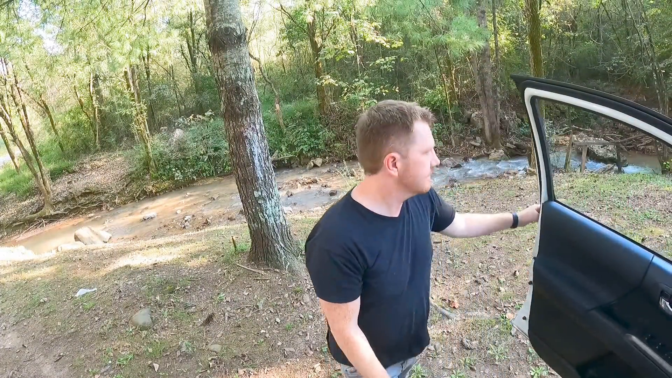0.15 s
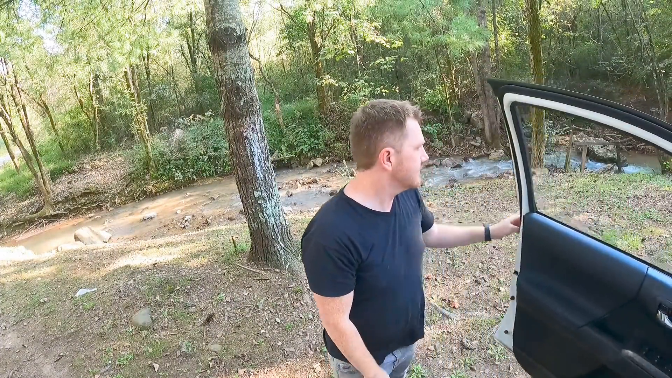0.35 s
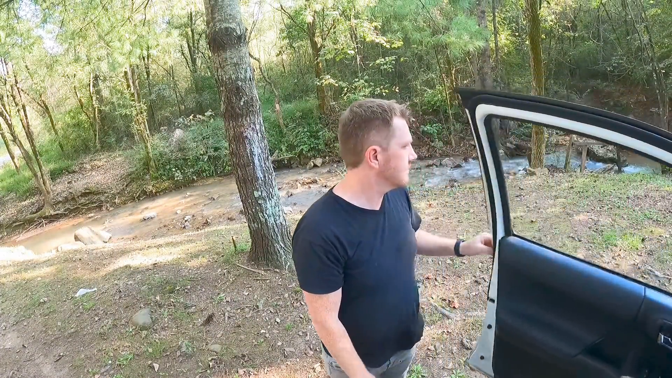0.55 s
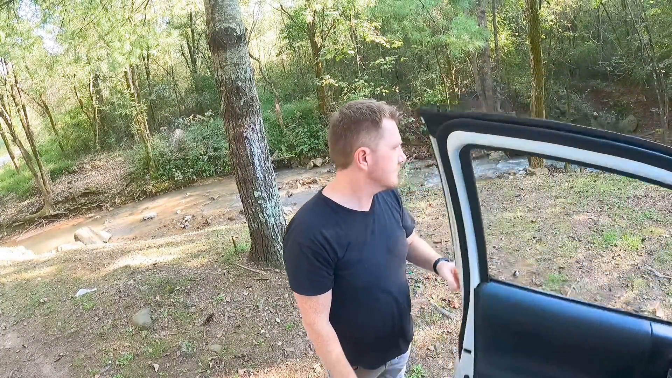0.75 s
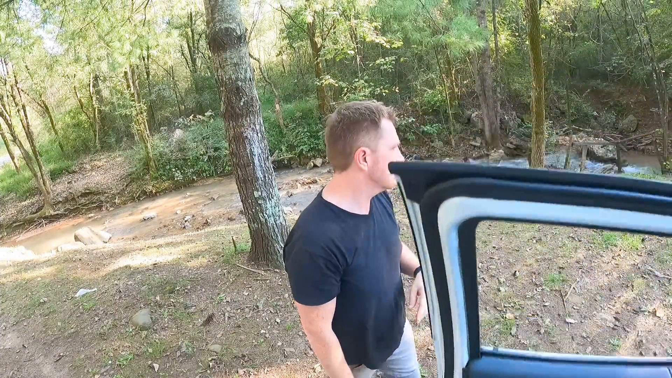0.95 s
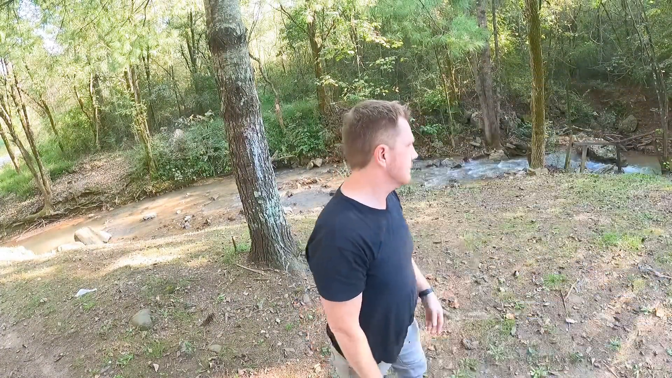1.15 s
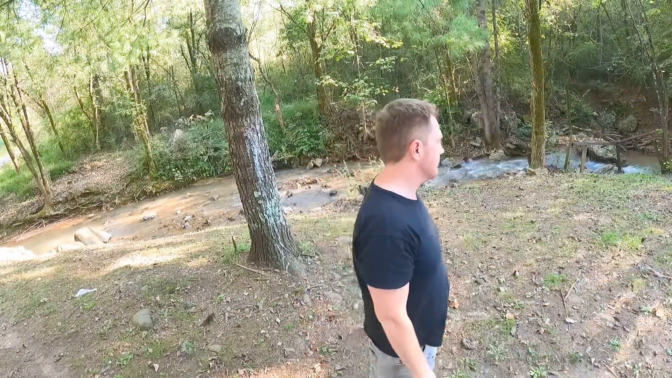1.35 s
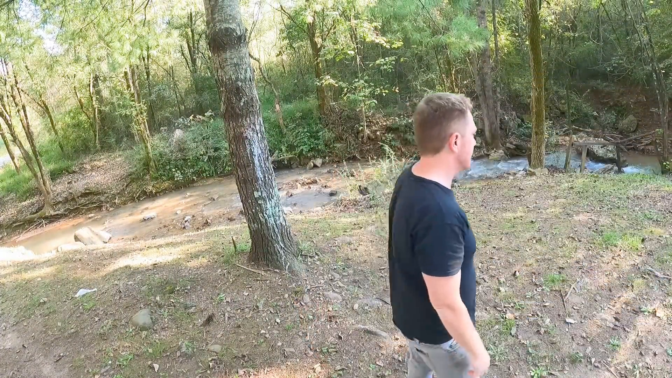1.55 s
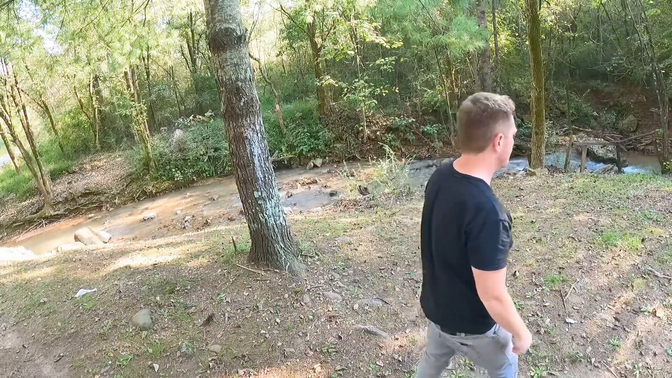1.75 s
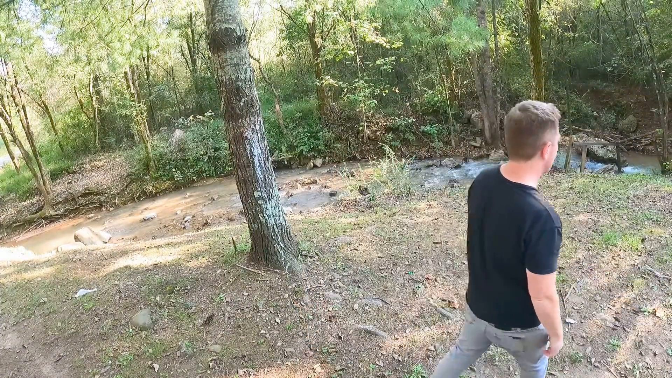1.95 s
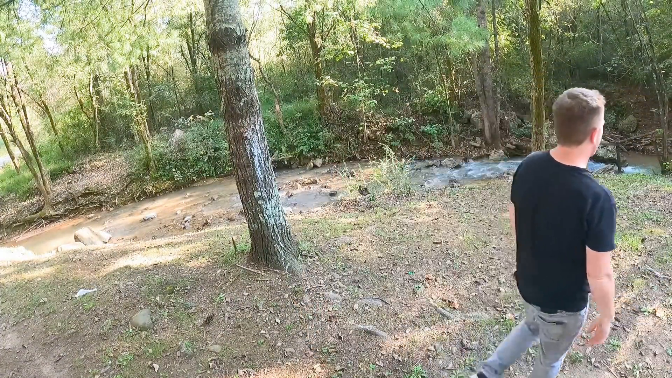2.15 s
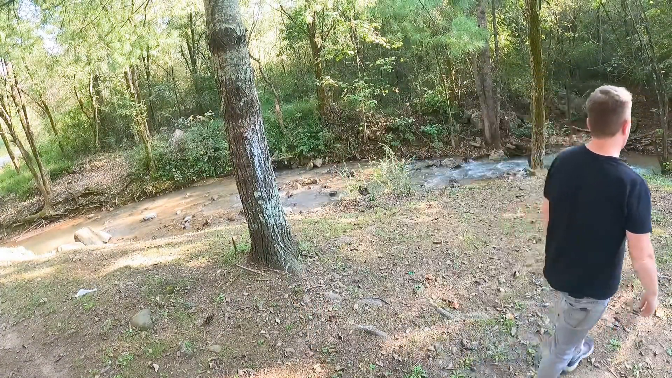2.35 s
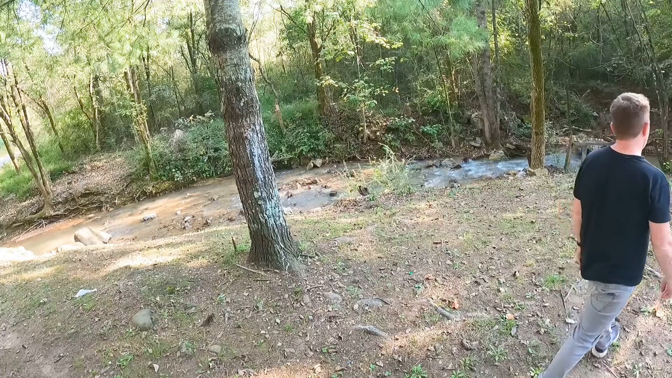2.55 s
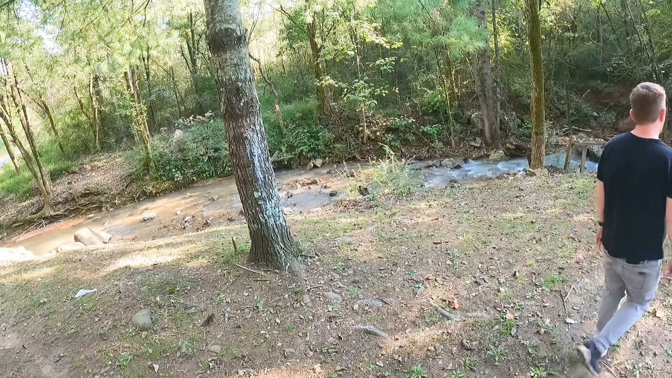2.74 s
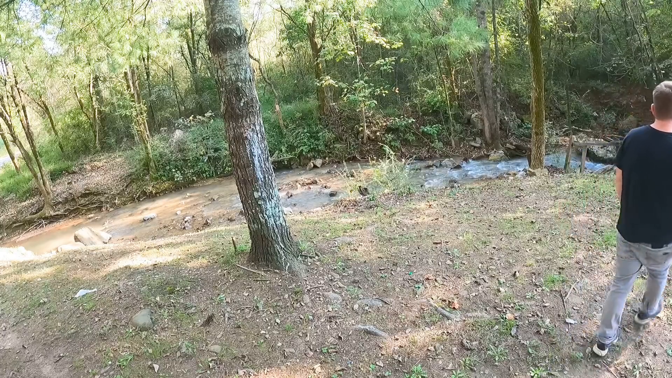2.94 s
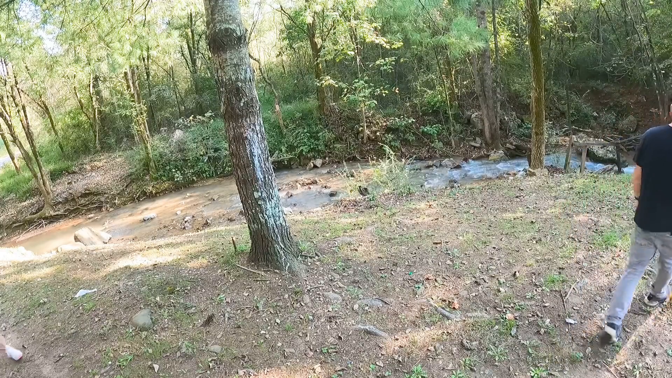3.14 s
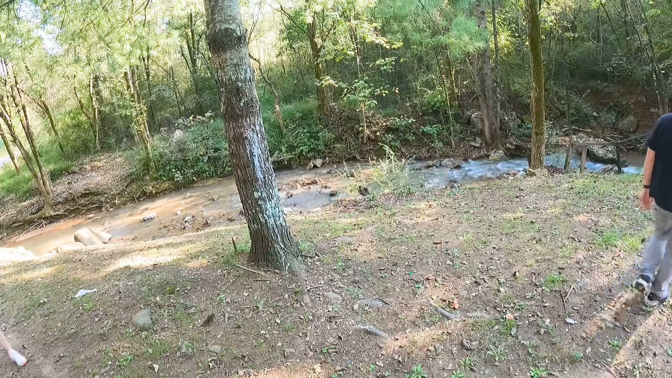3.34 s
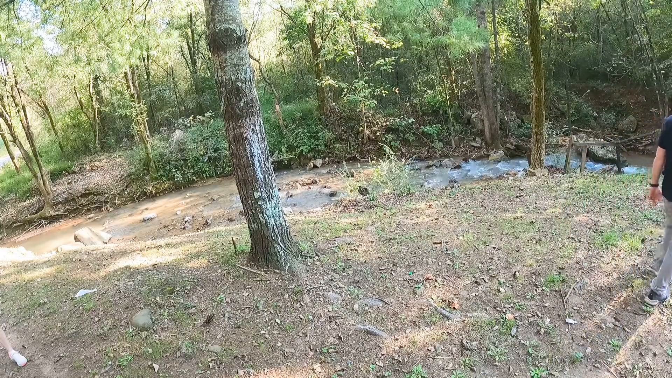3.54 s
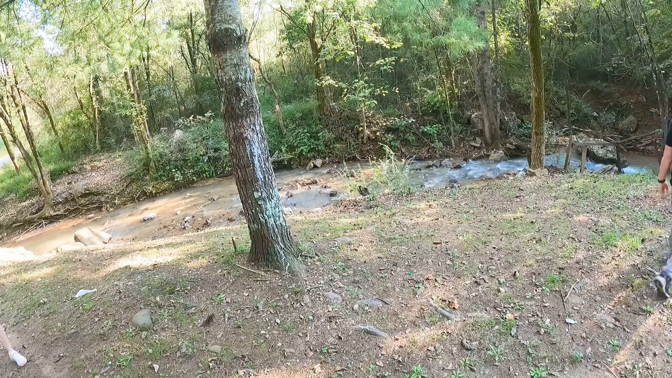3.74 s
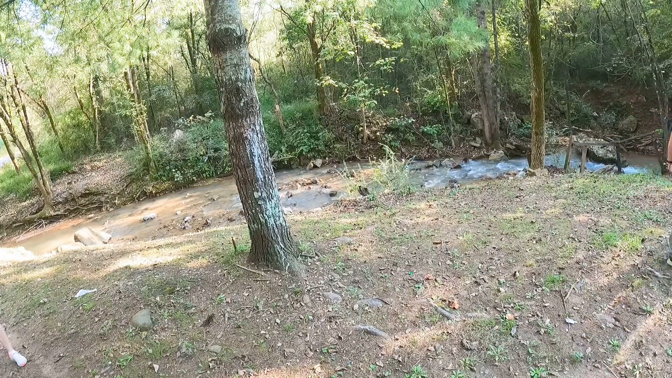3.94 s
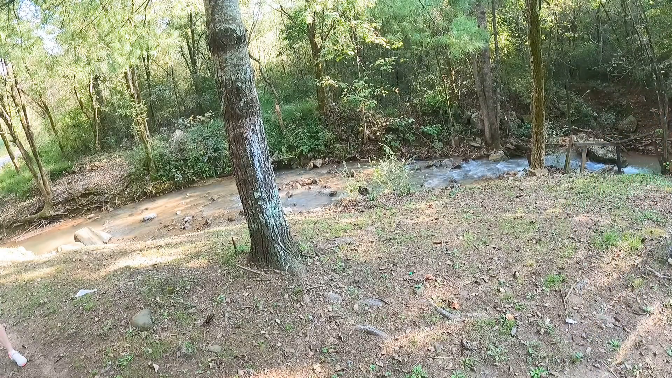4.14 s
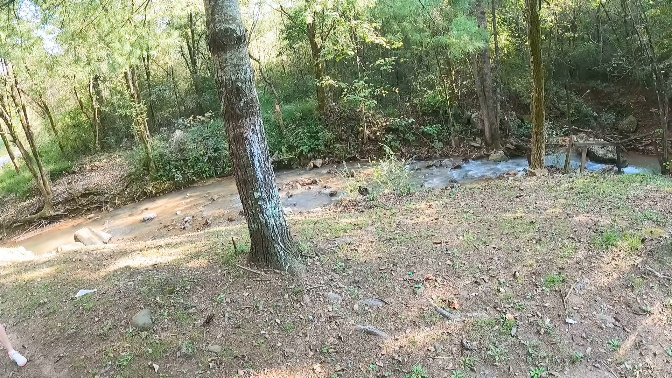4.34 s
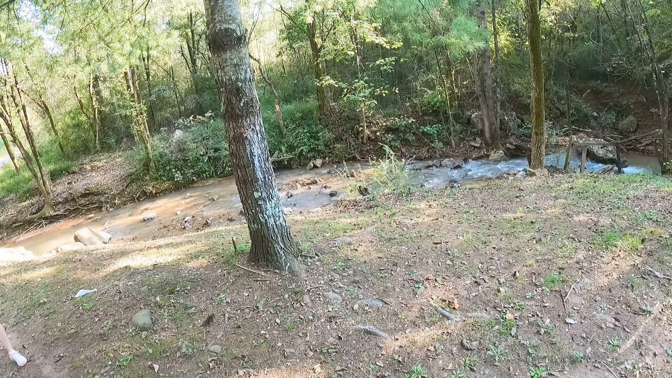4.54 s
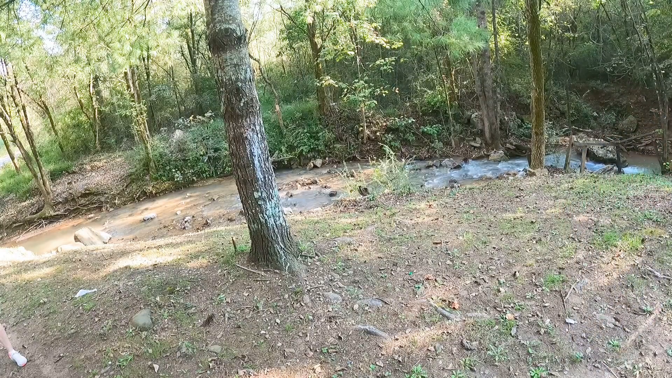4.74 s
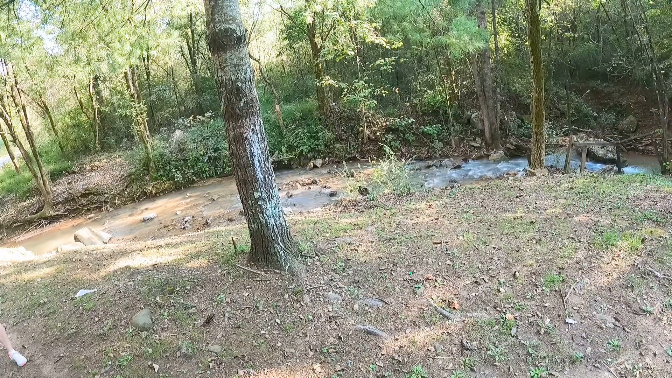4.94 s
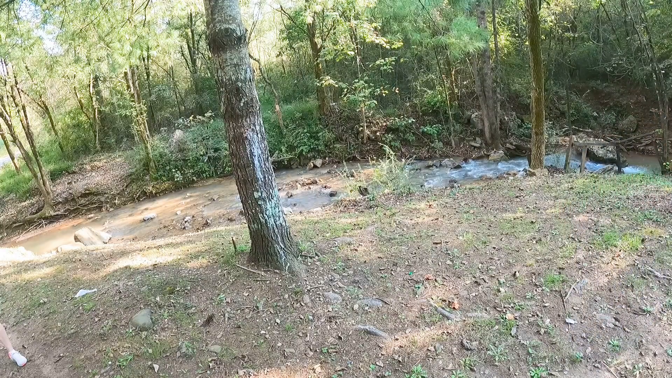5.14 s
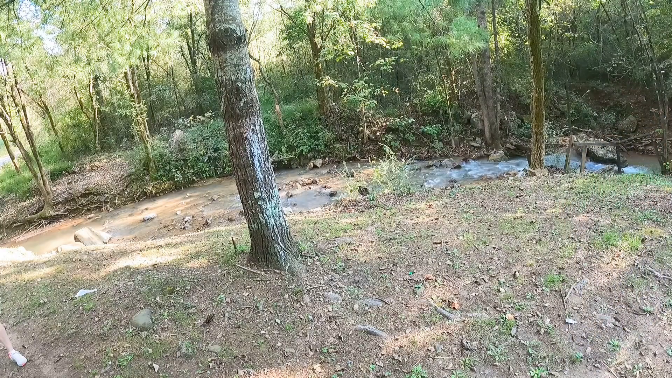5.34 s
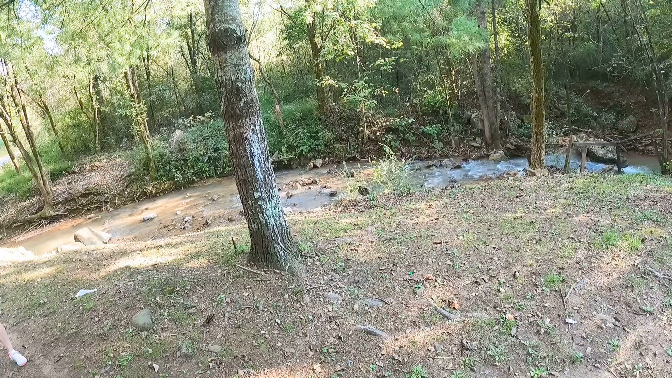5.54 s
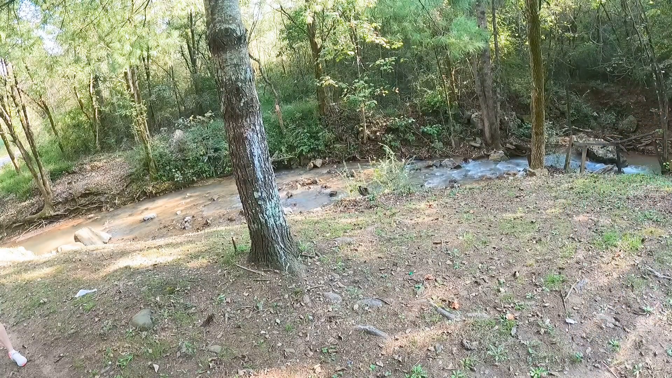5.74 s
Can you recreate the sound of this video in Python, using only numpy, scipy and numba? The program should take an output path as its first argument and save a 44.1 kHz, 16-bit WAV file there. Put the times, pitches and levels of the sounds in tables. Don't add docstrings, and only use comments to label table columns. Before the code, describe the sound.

A creek rushes over stones in woodland with a faint distant road and engine drone. Light scuffs come first, then a car door slams about a metre away: metallic clack, panel thud, deep cabin boom. The small camera microphone ducks the water, which slowly returns as shoes scuff dirt and twigs tick. Near the end something taps the microphone.

```python
import sys
import numpy as np
from scipy import signal
from scipy.fft import rfft, irfft, next_fast_len
from scipy.io import wavfile
from scipy.ndimage import uniform_filter1d
from numba import njit

SR = 44100
rng = np.random.default_rng(int(sys.argv[2]) if len(sys.argv) > 2 else 0)


def voltage_ratio(level):
    return 10 ** (np.asarray(level, float) / 20)


def to_wav(s):
    ch = np.atleast_2d(s).T
    pcm = np.round(np.clip(ch, -1, 1) * 32767)
    wavfile.write(sys.argv[1], SR, pcm.astype(np.int16))


N = 259749
T = np.arange(N) / SR

# time in seconds, then latch, panel, body, crack and striker levels in dB.
BLOWS = [(1.3411, -9.5, -46, -36, -31, -6.5), (1.3469, -15, -17.5, -35, -54, -23),
         (1.352, -18.5, -28, -36, -32, -20), (1.3549, -9.5, -20, -35, -29.5, -19),
         (1.3573, -17.5, -11.5, -17, -25, -11), (1.3615, -27, -19, -19, -33, -28),
         (1.3651, -29, -10, -17, -48, -22), (1.372, -22, -31, -27, -41, -35),
         (1.383, -14, -31, -12, -28.5, -30), (1.3873, -23, -17, -21, -43, -34),
         (1.39, -21, -29, -27, -38, -36), (1.395, -29, -26, -31, -51, -33),
         (1.402, -32, -19, -19.5, -50, -38), (1.409, -31, -30, -30, -50, -40),
         (1.418, -26, -28, -35, -46.5, -38), (1.431, -26, -27, -30, -52, -32),
         (1.442, -41, -21, -33, -59, -45), (1.456, -36, -30, -28, -58, -48)]
# pitch in Hz, level in dB, t60 in seconds.
LATCH_MODES = [(707, -8.5, 0.0613), (800, -14.5, 0.044), (890, -7.5, 0.1), (1180, -6.5, 0.057),
               (1260, -6.5, 0.039), (1430, -2.5, 0.031), (1500, -8.5, 0.03), (1610, -4, 0.026),
               (1700.8, -0.5, 0.018), (1940, -14, 0.016), (2030, -20, 0.028), (2350, -17, 0.019)]
STRIKER_MODES = [(2516, -14, 0.0226), (2640, -5.5, 0.021), (2800, -5, 0.02), (2900, -4.5, 0.019),
                 (3100, -15, 0.022), (3200, -34, 0.021), (3800, -12, 0.022)]
SKIN_MODES = [(195, -2, 0.12), (218, -13, 0.04), (276, 1.5, 0.077), (297, -4, 0.0751), (337, -2, 0.056),
              (370, 0.5, 0.04), (404, -1, 0.042), (455, -4, 0.055), (498, -12, 0.11), (533, -13, 0.083)]
SHELL_MODES = [(67, 3, 0.22), (81.7, -7, 0.61), (102.23, -7, 0.5), (118, -11, .2), (144, -6, 0.14),
               (160, -6.5, 0.3)]
# time in seconds, pitch in Hz, level in dB, t60 in seconds.
SEAL = (1.3605, 243, -6, .06)
# time in seconds, pitch in Hz, level in dB, t60 in seconds.
SETTLES = [
    (1.3647, 250, -7, .03),
    (1.3752, 129, -11, .22),
    (1.3828, 52, -8, .075),
]
# time in seconds, pitch in Hz, level in dB, t60, vent opening and vent fade in seconds.
CABIN_AIR = (1.3755, 19.6, -6.3, 1.3, 1.57, .07)
# left minus right in dB, Hz above which the ports differ more, that difference in dB.
DOOR_PORTS = (-1, 2800, -13.5)
# start in seconds, length in seconds, level in dB, bright top level in dB.
SCUFFS = [(0.335, 0.06, -48, -76), (.365, 0.048, -48, -74), (0.452, 0.035, -44, -66),
          (0.471, 0.093, -43, -58), (0.558, 0.06336, -54.5, -72.5), (1.225, 0.0315, -61, -73),
          (2.781, 0.065, -65, -93.5), (3.083, 0.04, -66, -58), (3.107, 0.081, -46, -63),
          (3.566, 0.0614, -56.5, -77), (5.363, 0.11, -59, -74), (5.536, 0.07, -66, -80.5)]
# time in seconds,
# level in dB, Hz, left minus right in dB, t60 in seconds.
TICKS = [(0.338, -28.5, 1500, -2, 0.01191), (.915, -27, 408, 1.5, 0.11), (.925, -27.5, 580, 1, 0.07326),
         (1.6085, -41.5, 8994, 12, 0.002007), (1.775, -37, 7246, 4, 0.00593),
         (1.774, -40.5, 10500, 7, 0.001499), (.079, -37, 11000, 0, .002), (.153, -33, 6000, 3, .002),
         (.386, -37, 6500, 5, .002), (.459, -30, 4500, 0, .006), (3.11, -31, 7500, 0, .004),
         (3.1185, -38, 12000, 0, .0015), (3.142, -35, 8000, 0, .002), (3.152, -33, 4300, 0, .006),
         (3.24, -41, 9000, 0, .002), (3.117, -13, 160, 6, 0.018), (3.252, -30, 4300, 2, 0.00998),
         (3.385, -43, 10450, 3, 0.002005), (3.6636, -34, 5500, -1.5, 0.00499),
         (4.7572, -28.5, 5522, -4, 0.00937), (5.09, -34, 3640, -1.5, 0.00798),
         (5.2296, -31, 6225, -1.5, 0.00597), (5.3502, -25, 3800, -10, 0.001),
         (5.3492, -30, 1290, 1, 0.0028), (5.4977, -34, 5060, -2.5, 0.00612),
         (5.563, -25, 4195, -1, 0.00411)]
# time in seconds, depth in full scale, length in ms, rebound share.
TAP = [
    (5.3497, .35, .28, .55),
    (5.3526, .4, 2.1, .25),
]
# pitch in Hz, level in dB per Hz.
CREEK_SPECTRUM = [(18, -19), (45, 3.5), (110, -6.5), (250, -9), (500, -13), (950, -17), (1500, -22.5),
                  (2600, -31), (3500, -29.5), (4600, -29), (5700, -36), (7500, -35), (8200, -42.5),
                  (12300, -54.5), (15600, -73)]
# pitch in Hz, side minus mid in dB.
SIDE_LEVEL = [(60, -36.5), (200, -29.5), (400, -21.5), (750, -15), (1300, -10.5), (2400, -2), (4400, -12.5),
              (8100, -5), (10500, -9), (12500, 1.5), (15000, -3)]
# pitch in Hz, width in Hz, level in dB over the rumble.
TYRE_DRONE = [
    (50.969, 12, -11),
    (88.8, 14, -16.5),
]
# time in seconds, pitch in Hz, level in dB over the rumble.
ENGINE = [(0, 193.4, -7), (1.3, 194.4, -9), (2.4, 187.2, -9.5), (3.0, 186.2, -5), (3.7, 182, -3.5),
          (4.2, 180.2, -2), (5.3, 177.1, -3), (5.89, 176.5, -9.5)]
# time in seconds, depth in dB, extra treble depth in dB.
DUCKS = [
    (1.36, 11, 2),
    (5.45, 0.5, 6),
]
# time in seconds, depth in dB, recovery in seconds.
TAP_DUCK = (5.3505, 7, .012)
# time in seconds, spread in seconds, level in dB.
SLAM_BOOM = (1.47, 0.2, 5.5)
# pitch in Hz, level in dB.
MIC_COLOUR = [(20, -0.5), (7400, 0), (8100, -1.5), (9800, -1.5), (12600, 0.5), (13600, -2), (14600, -5),
              (15700, 4)]

RUSH_DB, HISS_DB, RUMBLE_DB = -38.3, -45.5, -35
STEREO_CLOSES_S = 5.43
SIDES = np.array([[1], [-1]])


def along(table, hz):
    points_hz, values = np.transpose(table)
    return np.interp(np.log(hz), np.log(points_hz), values)


def unit(x):
    return x / np.sqrt(np.mean(x ** 2))


def highpass(x, order, hz):
    return signal.sosfilt(signal.butter(order, hz, "high", fs=SR, output="sos"), x)


@njit
def ring(x, hz, t60):
    y, z = np.empty(len(x)), 0j
    turn = np.exp(2j * np.pi * hz / SR - np.log(1000) / (t60 * SR))
    for i in range(len(x)):
        z = z * turn + x[i] + 1e-18
        y[i] = z.imag
    return y


def band(hz, width_hz, channels=1):
    size = next_fast_len(N)
    lo, hi = (int(np.clip(hz + s * 3 * width_hz, 1, SR / 2 - 9) * size / SR) for s in (-1, 1))
    bell = np.exp(-((np.arange(lo, hi) * SR / size - hz) / width_hz) ** 2 * 2)
    real, imag = rng.standard_normal((2, channels, hi - lo))
    spec = np.zeros((channels, size // 2 + 1), complex)
    spec[:, lo:hi] = bell * (real + 1j * imag)
    return unit(irfft(spec, size)[:, :N])


def walk(rate):
    k = int(SR / rate)
    held = np.repeat(rng.standard_normal(N // k + 1), k)
    return 1.54 * uniform_filter1d(uniform_filter1d(held, k), k)[:N]


def push(s, ms, t=T):
    force, near = np.zeros(len(t)), np.abs(t - s) < ms / 300
    force[near] = np.exp(-.5 * ((t[near] - s) / (ms / 2000)) ** 2)
    return force / force.sum()


def pan(x, db):
    return x * voltage_ratio(SIDES * db / 2)


def burst(since, rise_s, fade_s):
    return (1 - np.exp(-since / rise_s)) * np.exp(-since / fade_s)


def strike(force, modes, db, scatter_db, detune):
    out = 0
    for k, (hz, mode_db, t60) in enumerate(modes):
        louder, sharper = rng.standard_normal(2)
        level = voltage_ratio(db + mode_db + scatter_db * louder) * (-1) ** k
        out = out + level * ring(force, hz * (1 + detune * sharper), t60)
    return out


def latch_and_door(t, span):
    grit = (band(3900, 5300)[0] + voltage_ratio(-20.5) * band(9900, 6500)[0])[span]
    thud, clatter = band(270, 880)[0][span], band(1050, 2810.4)[0][span]
    choke = np.exp(-np.clip(t - SEAL[0], 0, 9) / .004)
    choked_latch = [(hz, db, t60 * .55) for hz, db, t60 in LATCH_MODES]
    door = np.zeros(len(t))
    for s, latch_db, skin_db, shell_db, crack_db, striker_db in BLOWS:
        contact_ms = np.clip(0.035 - 0.84 * (latch_db - crack_db) + 2.7 * (s - BLOWS[0][0]), .11, .4)
        force, since = push(s, contact_ms, t), np.clip(t - s, 0, 9)
        modes, fade = (choked_latch, 1) if s > SEAL[0] else (LATCH_MODES, choke)
        door += strike(force, modes, latch_db - 1.5, scatter_db=2.5, detune=0.018) * fade
        door += strike(force, STRIKER_MODES, striker_db - 2.5, scatter_db=-2.5, detune=0.016)
        door -= strike(force, SKIN_MODES, skin_db - 9, scatter_db=3, detune=0.018)
        door += strike(push(s, 1.8, t), SHELL_MODES, shell_db - 1, scatter_db=6, detune=0.019)
        door += voltage_ratio(crack_db + 1.5) * grit * burst(since, 0.00078, 0.0036)
        door += voltage_ratio(skin_db - 6) * thud * burst(since, 0.0013, 0.0091)
        door += voltage_ratio(latch_db - 13) * clatter * burst(since, 0.0005, 0.009)
    return door


def seal_thud(t):
    s, hz, db, t60 = SEAL
    out = voltage_ratio(db) * ring(push(s, 0.49, t), hz, t60)
    for s, hz, db, t60 in SETTLES:
        out += voltage_ratio(db) * ring(push(s, 0.66, t), hz, t60)
    return out


def cabin_boom(t):
    s, hz, db, t60, vent_s, fade_s = CABIN_AIR
    build = 1 - np.exp(-np.clip(t - s, 0, 9) / .04)
    leak = np.exp(-np.clip(t - vent_s, 0, 9) / fade_s)
    return voltage_ratio(db) * ring(push(s, 12, t), hz, t60) * leak * build


def slam():
    span = slice(int(1.3 * SR), int(2.1 * SR))
    t = T[span]
    door = latch_and_door(t, span) + seal_thud(t) + cabin_boom(t)
    tail = rng.standard_normal((2, 5000)) * np.exp(-np.arange(5000) / (0.01478 * SR))
    echo = signal.fftconvolve(highpass(door, 1, 300)[None], tail, axes=1)[:, :len(t)]
    pan_db, differ_hz, differ_db = DOOR_PORTS
    differ = voltage_ratio(differ_db) * highpass(door, 2, differ_hz) * SIDES
    out = np.zeros((2, N))
    out[:, span] = pan(door, pan_db) + differ + voltage_ratio(-40.5) * echo
    return out


def feet():
    grit, grit_side = band(3000, 7000, channels=2)
    dust, dust_side = band(10200, 4358, channels=2)
    grit, dust = grit + 0.11 * grit_side * SIDES, dust + 0.338 * dust_side * SIDES
    crunch = voltage_ratio(2.1 * walk(250))
    out = np.zeros((2, N))
    for s, length, db, top_db in SCUFFS:
        swell = np.sin(np.pi * np.clip((T - s) / length, 0, 1)) ** 0.7 * crunch
        out += swell * (voltage_ratio(db) * grit + voltage_ratio(top_db) * dust)
    for s, db, hz, pan_db, t60 in TICKS:
        out += pan(voltage_ratio(db) * ring(push(s, 0.036), hz, t60), pan_db)
    return out


def bulge(s, ms):
    force = push(s, ms)
    return force / force.max()


def tap():
    dent = np.zeros(N)
    for s, depth, ms, share in TAP:
        rebound = share * bulge(s + 3.6 * ms / 1000, 3.1 * ms)
        dent += depth * (rebound - bulge(s, ms))
    return pan(voltage_ratio(-0.5) * highpass(dent, 1, 22), -6)


@njit
def bubbles(start, hz, cycles, size, glide):
    y = np.zeros(N + 4000)
    for k in range(len(start)):
        w, z = 2 * np.pi * hz[k] / SR, size[k] + 0j
        fade = np.exp(-hz[k] / (cycles * SR))
        count = min(int(5 * cycles * SR / hz[k]), 3999)
        for i in range(count):
            z *= fade * np.exp(1j * w * (1 + glide * i / count))
            y[start[k] + i] += z.imag
    return y[:N]


def fizz():
    when, pitch, luck = rng.random((3, 2500))
    size = voltage_ratio(-3.3 * np.log(1 - .99 * luck) - 12 * pitch)
    return unit(bubbles((when * N).astype(np.int64), 500 * 14 ** pitch, 6.65, size, 0.55))


def creek(rush_db, hiss_db, rumble_db, width_db):
    mids, sides = np.zeros((2, N))
    surge_db, width = .7 * walk(9), voltage_ratio(width_db)
    for hz in 20 * 2 ** np.arange(0, 9.7, 1 / 3):
        mid, side = band(hz, hz * .24, channels=2)
        low, high = np.clip(np.log2(400 / hz), 0, 1), np.clip(np.log2(hz / 1300), 0, 1)
        flow_db = low * rumble_db + high * hiss_db + (1 - low - high) * rush_db
        if hz < 45:
            flow_db = flow_db + width_db * (T < STEREO_CLOSES_S)
        flow_db = flow_db - flow_db[N // 2:].mean()
        band_db = along(CREEK_SPECTRUM, hz) + 10 * np.log10(hz)
        gain = voltage_ratio(flow_db + band_db + surge_db + 0.49 * walk(12))
        mids += gain * mid
        sides += gain * side * voltage_ratio(along(SIDE_LEVEL, hz)) * (width if hz < 11500 else 1)
    return voltage_ratio(-58) * np.array([mids + sides, mids - sides]) + fizz() * voltage_ratio(hiss_db - 0.5)


def road(rumble_db):
    s, hz, db = np.transpose(ENGINE)
    phase = 2 * np.pi * np.cumsum(np.interp(T, s, hz) * (1 + 0.0024 * walk(8.95))) / SR
    level_db = np.interp(T, s, db) + rumble_db
    out = voltage_ratio(level_db + 2.2 * walk(6)) * np.sin(phase)
    out += voltage_ratio(level_db - 1.5 + 2.5 * walk(4)) * np.sin(phase * 4 / 5)
    for hz, width_hz, db in TYRE_DRONE:
        out = out + band(hz, width_hz) * voltage_ratio(rumble_db + db + 0.53 * walk(3.5))
    return out


def gain_control():
    gain_db, treble_db = 0.25 * T, 0.25 * (T - 3)
    for s, depth_db, extra_db in DUCKS:
        since = np.clip(T - s, 0, 9)
        duck = (1 - np.exp(-since / 0.25)) * np.exp(-(since / 0.96) ** 2)
        gain_db = gain_db - depth_db * duck
        treble_db = treble_db - extra_db * duck
    s, dip_db, back_s = TAP_DUCK
    dip = (T > s) * np.exp(-(np.clip(T - s, 0, 9) / back_s) ** 2)
    return gain_db - dip_db * dip, treble_db


def scene():
    gain_db, treble_db = gain_control()
    opening_db = -12.5 * np.exp(-(T / 1.33) ** 2)
    width_db = opening_db - 42 * np.clip(T - STEREO_CLOSES_S, 0, 9)
    hiss_db = HISS_DB + gain_db + treble_db + 0.17 * opening_db
    s, spread, boom_db = SLAM_BOOM
    rumble_db = RUMBLE_DB + gain_db + boom_db * np.exp(-((T - s) / spread) ** 2)
    background = creek(RUSH_DB + gain_db, hiss_db, rumble_db, width_db) + road(rumble_db)
    return slam() + feet() + tap() + background


def roll_off(x):
    return signal.sosfilt(signal.butter(12, 15720, fs=SR, output="sos"), x)


def record(dry):
    size = next_fast_len(N)
    colour = voltage_ratio(along(MIC_COLOUR, np.arange(size // 2 + 1) * SR / size + 1))
    heard = irfft(rfft(np.tanh(dry), size) * colour, size)[:, :N]
    top_cut = signal.ellip(8, .2, 60, 15740, fs=SR, output="sos")
    return roll_off(signal.sosfilt(top_cut, heard))


dry = scene()
out = record(dry)
to_wav(out)
```